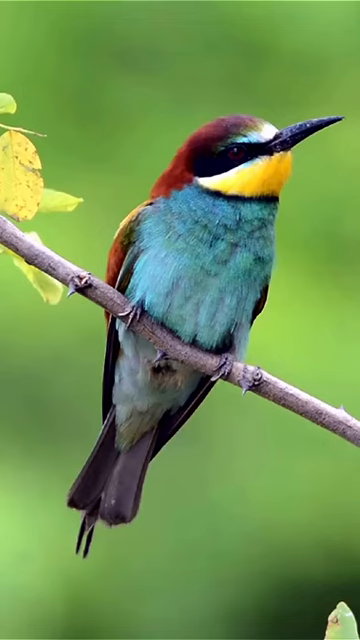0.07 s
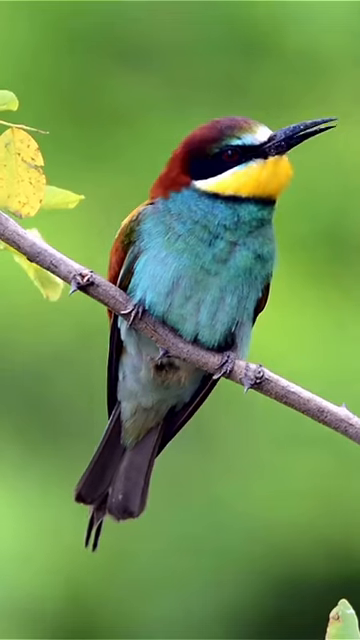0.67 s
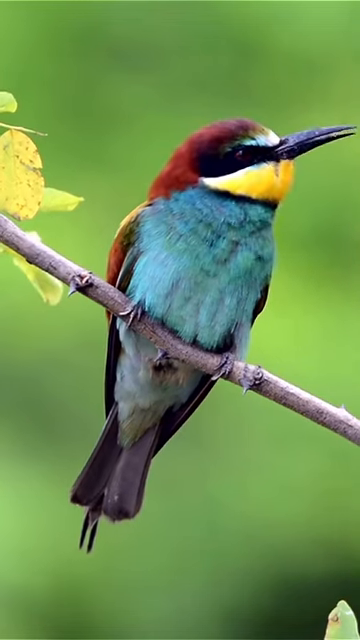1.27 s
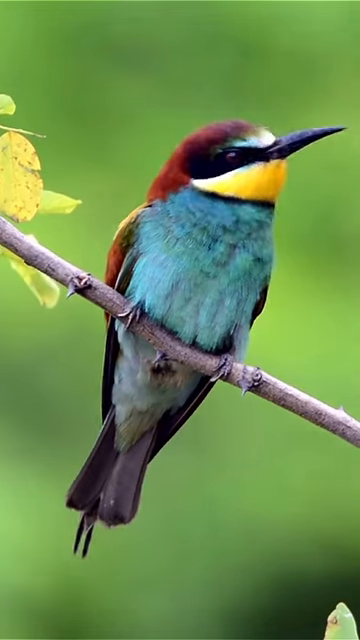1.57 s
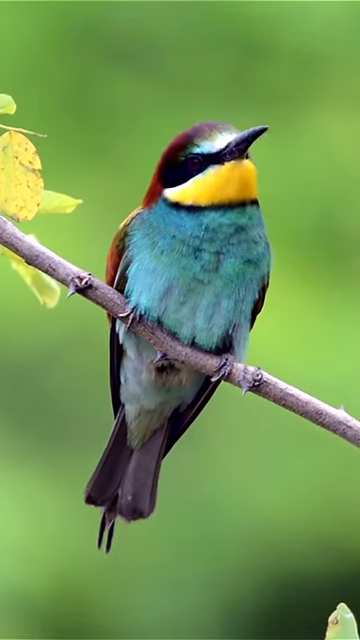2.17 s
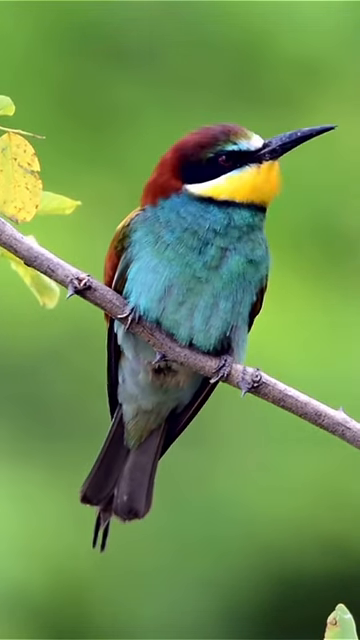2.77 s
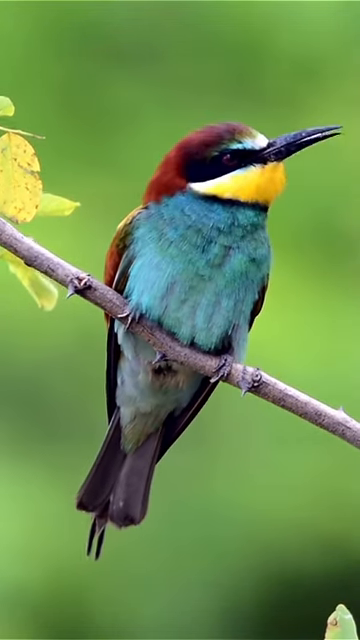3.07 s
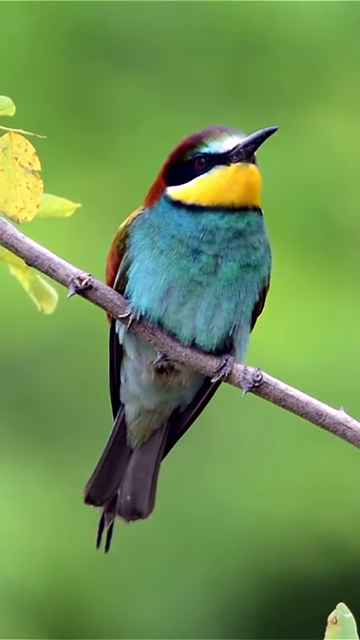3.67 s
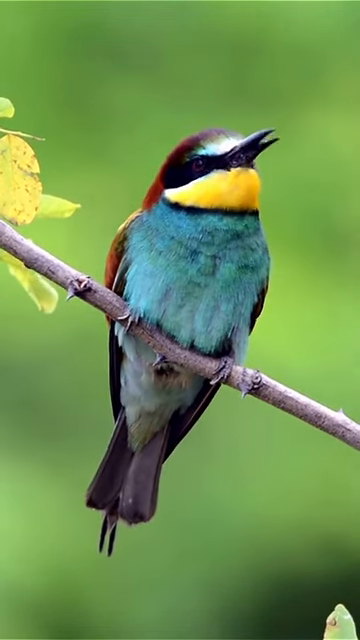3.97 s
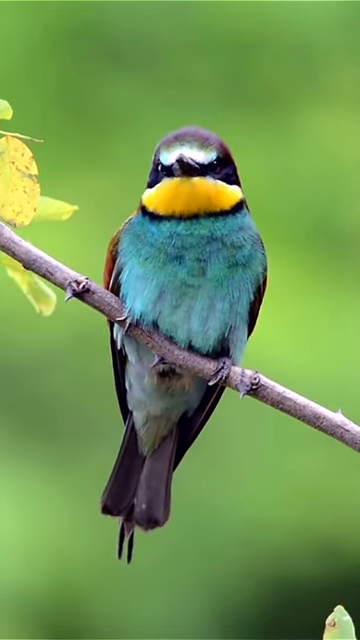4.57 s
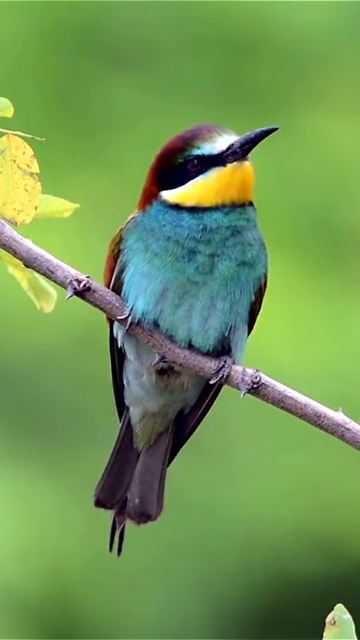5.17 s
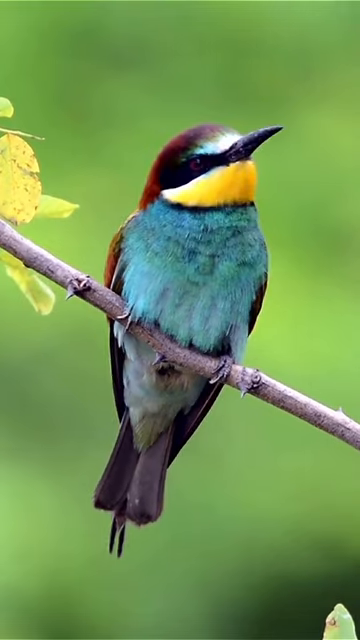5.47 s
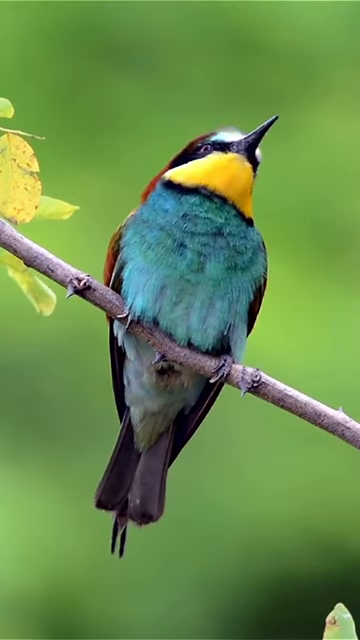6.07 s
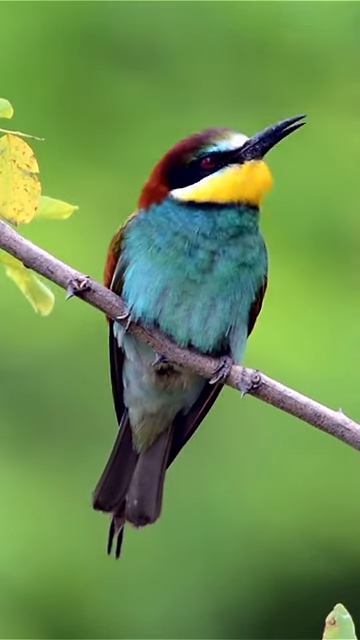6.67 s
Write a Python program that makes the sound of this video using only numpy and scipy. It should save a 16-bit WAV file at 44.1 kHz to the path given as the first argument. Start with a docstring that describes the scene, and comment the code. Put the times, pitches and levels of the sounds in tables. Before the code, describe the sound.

Small birds call in leafy woodland over a steady hiss of open air. Scattered twitters, sharp chips and a raspy warble come first, then a close bird pipes short, clear high notes through the middle. A small twig snaps, and pure rising whistles stand out towards the end. Thin chirps and a faint chorus lie far behind. Each note has a short echo, and everything sits near the centre of the microphone's image.

```python
"""A close bird pipes clear notes in leafy woodland, answered by a blurred warble further off, a lower
twitter, rising whistles and thin far chirps. Each voice is a gliding, trembling tone from the syrinx,
and trunks and leaves scatter every note into a short tail. Behind them lie far drawn-out cries,
a distant chorus, one twig snap that rings the wood, and the steady hiss of the open air."""
import sys
import numpy as np
from scipy import signal
from scipy.io import wavfile
from scipy.ndimage import uniform_filter1d

SR = 44100
rng = np.random.default_rng(int(sys.argv[2]) if len(sys.argv) > 2 else 0)


def put_to_file(sound):
    """Save the sound as 16-bit audio at rate SR, in the file named by the first command-line argument."""
    columns = np.atleast_2d(sound).T  # one column per channel
    safe = np.clip(columns, -1, 1)
    whole_steps = np.round(safe * 32767)
    wavfile.write(sys.argv[1], SR, whole_steps.astype(np.int16))


N = 300321
TIME = np.arange(N) / SR
ALONG = np.linspace(0, 1, 41)   # share of a note gone by


def piper():
    """The close bird's piping and a quick run of pips; a nearby trunk throws them back, so they beat."""
    # Each row: start in seconds, length in seconds, held pitch in Hz, drop onto it in Hz, glide in Hz,
    # loudest point as a share of the length, level in dB.
    piping = [ (1.825, 0.0374, 2682, 4, -330, .65, -41.5), (2.927, 0.026, 3080, 1, 803, 0.35, -39),
              (3.312, 0.019, 2907, 549, -150, 0.39, -35), (3.515, 0.025, 2970, 62, -62, .4, -51),
              (3.532, 0.066, 2907, -3, 22, 0.88, -40.5), (3.604, 0.043, 3407, 358, 9, 0.51, -44),
              (3.72, 0.036, 3238, 104, 27, 0.75, -41.5), (3.752, 0.027, 3350, -5, 124, 0.64, -41),
              (4.205, 0.056, 3260, 137, -77, 0.62, -37.5), (4.339, 0.049, 3260, 349, 4, 0.75, -38),
              (4.39, 0.017, 3270, -2, -54, 0.7, -39.5), (4.408, 0.037, 3090, 5, 78, 0.88, -43.5),
              (4.431, 0.033, 3430, -200, 0.5, 0.67, -40), (4.606, 0.054, 3467, -140, 30, 0.79, -36.5),
              (4.762, 0.06, 3530, 480, -300, .9, -38.5), ]
    # Each row: start of a pip in seconds, level in dB.
    pips = [(3.043, -51), (3.058, -55), (3.075, -53), (3.093, -51), (3.109, -51)]
    notes = [pipe(*row) for row in piping]
    notes += [sweep(s, length=.0075, hz=3150, glide_hz=0, level_db=db, ends_db=-1) for s, db in pips]
    voice = syrinx(notes, waver=.008, flutter_db=2.2, edge_s=.0025, rasp=.1)
    trunk_echo = from_db(-12) * np.roll(voice, int(.011 * SR))
    return woodland(voice + trunk_echo, direct_db=-1.3, scatter_db=-11.5, t60=.41, build_s=.004, width=.18)


def pipe(s, length, held_hz, drop_hz, glide_hz, crest, level_db):
    """A note that drops onto a held pitch, swells to its crest and fades."""
    settle_s, swell_db, fade_db = .00612, 11.5, 8.5
    t, crest = length * ALONG, np.clip(crest, .1, .9)
    hz = held_hz + drop_hz * np.exp(-t / settle_s) + glide_hz * (ALONG - .5)
    swelling = swell_db * (1 - ALONG / crest) ** 2
    fading = fade_db * ((ALONG - crest) / (1 - crest)) ** 2
    return np.column_stack([s + t, hz, level_db - np.where(ALONG < crest, swelling, fading)])


def arch(s, length, first_hz, middle_hz, last_hz, level_db, ends_db):
    """A note that bends through three pitches; ends_db sets its ends against its middle."""
    bow = 4 * ALONG * (1 - ALONG)
    hz = first_hz + (last_hz - first_hz) * ALONG + (middle_hz - (first_hz + last_hz) / 2) * bow
    return np.column_stack([s + length * ALONG, hz, level_db + ends_db * (1 - bow)])


def sweep(s, length, hz, glide_hz, level_db, ends_db):
    """A note that glides straight through its pitch."""
    return arch(s, length, hz - glide_hz / 2, hz, hz + glide_hz / 2, level_db, ends_db)


def slur(s, length, first_hz, last_hz, settle_s, level_db):
    """A note that speaks quickly, falls in pitch, then levels out and fades."""
    attack_s, rise_db, fade_db_per_s = .008, 6, 120
    t = length * ALONG
    fallen = 1 - np.exp(-t / settle_s)
    hz = first_hz + (last_hz - first_hz) * fallen / fallen[-1]
    below_db = rise_db * np.maximum(1 - t / attack_s, 0) + fade_db_per_s * t
    return np.column_stack([s + t, hz, level_db - below_db])


def syrinx(notes, waver, flutter_db, edge_s, trill_db=0, rasp=0):
    """A trembling tone follows each note's rows of seconds, Hz and dB; rasp jitters it, in radians."""
    trill_hz, sheen_above_hz = 167.3, 5512
    tremble = 1 + waver * drift(120)
    strength_db = flutter_db * drift(60)
    jitter = rasp * drift(450)
    out = np.zeros(N)
    for note in notes:
        start, end = note[0][0], note[-1][0]
        span = slice(max(int((start - edge_s) * SR), 0), int((end + edge_s) * SR))
        t = TIME[span]
        hz, level_db = in_time(note, t)
        hz = uniform_filter1d(hz, size=160) * tremble[span]   # the muscles round off each turn
        phase = 2 * np.pi * np.cumsum(hz) / SR + jitter[span]
        opening = np.clip(np.minimum(t - start, end - t) / (2 * edge_s) + .5, 0, 1)
        throb_db = trill_db * np.cos(2 * np.pi * trill_hz * (t - start))
        envelope = np.sin(np.pi / 2 * opening) ** 2 * from_db(level_db + strength_db[span] + throb_db)
        sheen_db = -21 - .0075 * np.maximum(hz - 2200, 0)   # a thin sheen, fainter over high notes
        sheen = from_db(sheen_db) * np.sin(phase + 2 * np.pi * sheen_above_hz * t)
        out[span] += np.sqrt(2) * envelope * (np.sin(phase) + sheen)
    return out


def warbler():
    """A trilled, raspy voice behind foliage; its slurs and upward flick are cleaner and more direct."""
    # Each row: start and length in seconds, first, middle and last pitch in Hz, level in dB.
    warble = [ (0.191, 0.05, 3235, 3260, 2880, -48.5), (0.289, 0.0314, 2196, 2340, 2510, -47),
              (0.378, 0.088, 3490, 3600, 3600, -53), (1.342, 0.044, 3400, 3980, 4260, -48),
              (1.58, 0.038, 3595, 3830, 3815, -41), (1.624, 0.017, 3750, 3670, 3520, -37.5),
              (1.64, 0.015, 3420, 3260, 3020, -46.5), (1.664, 0.033, 2780, 2834, 3060, -50.5),
              (1.696, 0.04, 2980, 3206, 3200, -45.5), (3.096, 0.036, 4050, 3990, 3880, -48.5),
              (3.142, 0.014, 3810, 3550, 3200, -44), (3.168, 0.017, 3230, 3210, 3150, -44.5),
              (3.85, 0.048, 2440, 2500, 2620, -51), (4.328, 0.016, 3910, 3900, 3700, -52.5),
              (4.892, 0.072, 3514, 3890, 3370, -45), (4.982, 0.0664, 2610, 3070, 3180, -49.5),
              (6.114, 0.02, 3500, 3920, 3900, -49.5), ]
    # The contour of a hooked call. Each row: seconds into the call, pitch in Hz, relative level in dB.
    hook_shape = [(0, 3387, -4), (.012, 3600, 4), (.033, 4350, -13.5), (.052, 3490, -8)]
    # Each row: start of a hooked call in seconds, level in dB.
    hooks = [(2.259, -50.5), (3.199, -46.5), (3.878, -44.5)]
    # Each row: start and length in seconds, first and last pitch in Hz, settling in seconds, level in dB.
    slurs = [ (0.263, 0.03, 2420, 2027, 0.017, -45.5), (0.407, 0.026, 2930, 2407, 0.042, -43),
             (0.441, 0.031, 2864, 2393, 0.035, -48), (2.079, 0.14, 3200, 1798, 0.014, -45.5),
             (2.969, 0.06, 2550, 2040, .070, -56), (3.364, 0.032, 2704, 2243, 0.044, -42.5),
             (3.407, 0.039, 2310, 1970, 0.08, -56), (3.777, 0.065, 3100, 2450, 0.015, -44.5),
             (4.072, 0.03, 3860, 3300, 0.03, -40.5), (4.105, 0.034, 2903, 2700, 0.021, -42.5),
             (4.518, 0.039, 4110, 3350, 0.085, -45.5), (4.823, 0.08, 3300, 2747, 0.011, -44), ]
    # The contour of the flick. Each row: time in seconds, pitch in Hz, level in dB.
    flick = [(6.154, 3100, -57), (6.169, 3850, -46), (6.181, 4400, -45), (6.192, 4400, -41),
             (6.203, 4270, -46)]
    rough_notes = [arch(*row, ends_db=-1) for row in warble]
    rough_notes += [np.add(hook_shape, (s, 0, db)) for s, db in hooks]
    clean_notes = [slur(*row) for row in slurs] + [flick]
    rough = syrinx(rough_notes, waver=.018, flutter_db=2.3, edge_s=.003, trill_db=1.5, rasp=.36)
    clean = syrinx(clean_notes, waver=.014, flutter_db=2, edge_s=.003, trill_db=1.5, rasp=.3)
    return (woodland(rough, direct_db=-2.3, scatter_db=-6, t60=.3, build_s=.003, width=.34)
            + woodland(clean, direct_db=-1.8, scatter_db=-6.5, t60=.38, build_s=.004, width=.34))


def twitterer():
    """A lower voice in the nearest trees: quick sweeps, soft arched peeps and up-down chips."""
    # Each row: start and length in seconds, first, middle and last pitch in Hz, level in dB.
    sweeps = [ (0.311, 0.0092, 2210, 1870, 1560, -54.5), (0.572, 0.01, 2374, 2080, 1700, -55),
              (0.709, 0.0087, 2350, 1970, 1570, -54), (0.837, 0.01, 2160, 1760, 1430, -58),
              (0.957, 0.012, 2320, 1930, 1590, -57.5), (1.871, 0.043, 2082, 1873, 3380, -54),
              (4.754, 0.036, 2986, 2095, 1480, -61.5), (5.581, 0.054, 2116, 1934, 1654, -59.5),
              (5.779, 0.025, 1436, 1690, 2080, -57), ]
    # Each row: start and length in seconds, top pitch in Hz, level in dB.
    peeps = [(0.674, 0.019, 1763, -55.5), (0.789, 0.037, 1847, -56), (0.918, 0.026, 1770, -57),
             (1.175, 0.019, 1846, -59.5), (1.64, 0.017, 1813, -60), (1.826, 0.044, 1886, -56),
             (1.927, 0.032, 1810, -55), (3.551, 0.032, 1798, -53), (3.658, 0.036, 1698, -58),
             (5.972, 0.014, 1644, -56), (6.558, 0.04, 1875, -58.5)]
    # Each row: start of a chip's downstroke in seconds, level in dB.
    chips = [(0.622, -38.5), (2.335, -40.5), (2.514, -41), (2.701, -43)]
    # A chip's two strokes. Each row: offset and length in seconds, first and last pitch in Hz, trim in dB.
    strokes = [(-.026, 0.019, 1784, 2546, -14.5), (0, 0.0167, 3340, 2560, -7.5)]
    sag_hz = 199   # a peep starts and ends this far below its top
    notes = [arch(*row, ends_db=3.5) for row in sweeps]
    notes += [arch(s, length, hz - sag_hz, hz, hz - sag_hz, db, ends_db=-7) for s, length, hz, db in peeps]
    notes += [sweep(s + offset, length, (first + last) / 2, last - first, db + trim_db, ends_db=5.5)
              for s, db in chips for offset, length, first, last, trim_db in strokes]
    voice = syrinx(notes, waver=.029, flutter_db=2, edge_s=.002696, rasp=.25)
    return woodland(voice, direct_db=0, scatter_db=-3.5, t60=.29, build_s=.0028, width=.25)


def whistler():
    """Pure rising whistles from a near tree, mostly direct, with a faint long tail."""
    # Each row: start and length in seconds, centre pitch in Hz, rise in Hz, level in dB.
    whistles = [(5.033, 0.065, 1840, 130, -50), (5.096, 0.081, 2110, 320, -49.5),
                (5.185, 0.021, 2193, 4, -50.5), (6.117, 0.095, 2083, 220, -53.5),
                (6.413, 0.12, 2147, 236, -46.5), (6.711, 0.17, 2207, 330, -42)]
    notes = [sweep(*row, ends_db=-4.5) for row in whistles]
    voice = syrinx(notes, waver=.0027, flutter_db=2, edge_s=.0064)
    return woodland(voice, direct_db=-3.5, scatter_db=-15.5, t60=.87, build_s=.022, width=.3)


def far_birds():
    # Each row: start and length in seconds, centre pitch in Hz, glide in Hz, level in dB.
    far_chirps = [ (1.248, 0.055, 4260, 111, -49.5), (1.448, 0.025, 4880, -170, -53.5),
                  (1.557, 0.039, 5500, 50, -54.5), (1.995, 0.025, 4000, 304, -52.5),
                  (2.667, 0.018, 4960, -2, -51), (2.751, 0.016, 3010, -400, -47.5),
                  (2.886, 0.04, 3580, -150, -47.5), (3.833, 0.012, 4100, -400, -41.5),
                  (5.269, .035, 4020, 292, -57), (5.379, 0.052, 4960, 98, -58),
                  (5.746, 0.02, 3525, 98, -45.5), (6.083, 0.069, 5550, -47, -51.5),
                  (6.577, 0.017, 3590, 300.5, -47), ]
    # Each row: start and length in seconds, first, middle and last pitch in Hz, level in dB.
    far_rasps = [ (1.258, 0.046, 4300, 4900, 4070, -55.5), (1.559, 0.028, 3410, 3200, 3450, -48.5),
                 (2.146, 0.075, 3700, 5300, 3850, -52), (3.12, 0.07, 4930, 5000, 3850, -58),
                 (3.781, 0.06, 3900, 5320, 3930, -52.5), (4.57, 0.08, 5060, 5360, 4060, -53.5),
                 (4.9, 0.07, 3500, 3950, 3300, -49.5), (5.645, 0.06, 3900, 5330, 4090, -50),
                 (6.073, 0.041, 5600, 5500, 3780, -51), ]
    # Each row: start and length in seconds, centre pitch in Hz, glide in Hz, level in dB.
    far_cries = [(0.756, 0.79, 1337, 9, -69.5), (2.052, 0.36, 758, -39, -73), (2.415, 0.53, 1287, -20, -66)]
    chirps = syrinx([sweep(*row, ends_db=5) for row in far_chirps],
                    waver=.017, flutter_db=2.5, edge_s=.0029, rasp=.3)
    rasps = syrinx([arch(*row, ends_db=-1) for row in far_rasps],
                   waver=.035, flutter_db=2.5, edge_s=.005, rasp=.85)
    cries = syrinx([sweep(*row, ends_db=1.5) for row in far_cries], waver=.0447, flutter_db=4, edge_s=.037)
    return (woodland(chirps, direct_db=-9, scatter_db=-11.5, t60=.53, build_s=.0051, width=.35)
            + woodland(rasps, direct_db=-9, scatter_db=-10, t60=.24, build_s=.0044, width=.35)
            + woodland(cries, direct_db=-2.5, scatter_db=-4, t60=.56, build_s=.0071, width=.28))


def distant_chorus():
    """Birds too distant to tell apart, in four registers that swell and sink separately."""
    # Level rides for three of the registers. Each row: time in seconds, level in dB.
    mid_ride = [(.7, -60.5), (1.0, -68.5), (1.6, -68.5), (2.7, -64), (3.2, -66), (5.5, -79), (6.7, -63)]
    low_ride = [(.2, -59.5), (.9, -79), (1.2, -63), (1.6, -72.5), (3.9, -83)]
    thin_ride = [(.2, -64.5), (1.1, -70.5), (2.6, -69.5), (3.6, -63), (4.3, -70), (6.5, -65.5)]
    return (flock(flurry_ride(), centre_hz=4350, spread=.3, direct_db=-8, rasp=.85, count=480)
            + flock(mid_ride, centre_hz=2720, spread=.25, direct_db=-6.5, rasp=1.2, count=300)
            + flock(low_ride, centre_hz=1702, spread=.178, direct_db=10, rasp=.4, count=110)
            + flock(thin_ride, centre_hz=5150, spread=.17, direct_db=-6, rasp=.7, count=400))


def flurry_ride():
    """The high voices flare up from a quiet murmur; gives rows of seconds and dB."""
    # Each row: start and length of a flurry in seconds, level in dB.
    flurries = [(0.192, 0.037, -55), (1.28, 0.05, -62), (1.56, 0.019, -59), (2.186, 0.1, -54.5),
                (3.12, 0.26, -63), (3.78, 0.069, -56), (4.058, 0.18, -59), (4.9, 0.074, -60),
                (5.676, 0.1, -60), (6.083, 0.073, -60.5), (6.496, 0.22, -60.5)]
    rest_db, fade_db_per_s = -79, 203
    t = np.linspace(0, N / SR, 700)
    flares = [db - fade_db_per_s * np.maximum(np.abs(t - s - length / 2) - length / 2, 0)
              for s, length, db in flurries]
    return np.column_stack([t, np.maximum(np.max(flares, axis=0), rest_db)])


def flock(ride, centre_hz, spread, direct_db, rasp, count):
    """Many short random glides, blurred by the trees, following one level ride."""
    notes, note_s = [], .02234
    for k, (when, up, down, slope) in enumerate(rng.random((count, 4))):
        s = (k + when) / count * N / SR
        hz = centre_hz * np.exp(spread * (up - down))
        glide = np.exp(.1411 * (2 * slope - 1))
        notes.append([(s, hz / glide, 0), (s + note_s, hz * glide, 0)])
    voices = syrinx(notes, waver=.0269, flutter_db=3, edge_s=.004, rasp=rasp)
    blurred = woodland(voices, direct_db, scatter_db=0, t60=.25, build_s=.008, width=.45)
    return fader(ride) * rms_one(blurred)


def twig():
    """A twig snaps and knocks again, ringing the wood's short modes; so small a thing radiates no bass."""
    # Each row: time of a knock in seconds, level in dB.
    knocks = [(5.346, -43), (5.353, -49)]
    # Each row: frequency of a mode in Hz, level in dB, seconds to decay by 60 dB.
    modes = [(323, -10.5, 0.06), (720, 8, 0.0043), (1380, 1.5, 0.036), (2385, 1, 0.02), (2770, 0, 0.025)]
    clicks, wood = np.full(N, 1e-18), 0
    for s, level_db in knocks:
        clicks[round(s * SR)] = from_db(level_db)
    for hz, level_db, t60 in modes:
        radius, angle = from_db(-60 / (t60 * SR)), 2 * np.pi * hz / SR
        ring = signal.lfilter([.5, 0, -.5], [1, -2 * radius * np.cos(angle), radius * radius], clicks)
        wood = wood + from_db(level_db) * ring
    return woodland(wood, direct_db=-4, scatter_db=-6.5, t60=.56, build_s=.04, width=.3)


def woodland(x, direct_db, scatter_db, t60, build_s, width):
    """The direct sound, then a cloud of echoes from trunks and leaves that builds, dulls and dies."""
    leaf_cut_hz, leaf_loss_db_per_s = 3200, 70   # leaves soak up the treble faster
    t = TIME[:SR // 2]
    cloud = rng.standard_normal((2, len(t))) * (1 - np.exp(-t / build_s)) * from_db(-60 * t / t60)
    cloud = cloud / np.sqrt(np.sum(cloud ** 2, axis=1, keepdims=True))
    dull = signal.sosfiltfilt(signal.butter(4, leaf_cut_hz, fs=SR, output="sos"), cloud)
    mid, side = dull + (cloud - dull) * from_db(-leaf_loss_db_per_s * t)
    paths = (mid + width * side * np.array([[1], [-1]])).astype(np.float32)
    echoes = signal.fftconvolve(x[None].astype(np.float32), paths, axes=1)[:, :N]
    return from_db(direct_db) * x + from_db(scatter_db) * echoes


def open_air():
    """An even hiss, a low rush that swells towards the end, one soft whoosh and a faint top sizzle."""
    # Tone curves. Each row: frequency in Hz, relative spectral density in dB.
    hiss = [(22, -16), (36, -16.5), (55, -8.5), (110, -5.5), (200, -4.5), (500, 1.5), (750, 0.5), (1100, 0),
            (1700, 1.5), (2600, -1), (3800, 3.5), (5300, -5), (6200, -3), (6700, -7.5), (8800, -4),
            (10000, -16)]
    rush = [(100, -31.5), (200, -5.5), (300, -0.5), (450, -3.5), (800, -3)]
    whoosh = [(550, -6.5), (800, 1.5), (1200, -15.5), (1800, 9)]
    sizzle = [(7000, -3), (8300, -4.5), (10000, -3)]
    # Level rides. Each row: time in seconds, level in dB.
    rush_ride = [(.3, -77.5), (3.4, -84), (3.7, -69), (3.95, -71.5), (4.15, -87.5), (5.6, -72.5),
                 (6.3, -70), (6.5, -63), (6.8, -62.5)]
    whoosh_ride = [(3.9, -79), (4.1, -59.5), (4.25, -63), (4.5, -83)]
    sizzle_ride = [(.25, -83), (.35, -61.5), (.5, -65.5), (1.0, -86.5), (3.5, -79), (3.85, -70),
                   (4.0, -87.5), (5.9, -75), (6.6, -60.5), (6.8, -79)]
    return (from_db(-58.5) * air_noise(hiss, patchy_db=1.5)
            + fader(rush_ride) * air_noise(rush, patchy_db=1.5)
            + fader(whoosh_ride) * air_noise(whoosh, patchy_db=2)
            + fader(sizzle_ride) * air_noise(sizzle, patchy_db=6))


def air_noise(spectrum, patchy_db):
    """Unit-power stereo noise in half-octave bands, each with its own level, flutter and width."""
    # Each row: frequency in Hz, left-right likeness from 0 (wide) to 1 (mono).
    likeness = [(60, 0.85), (700, 0.6), (3000, 0.54), (5000, 0.79), (7000, 1)]
    edges_hz = 21 * 2 ** np.arange(0, 9.6, .5)
    mid, side, white = 0, 0, rng.standard_normal((2, 2, N))
    for k, (low, high) in enumerate(zip(edges_hz, edges_hz[1:])):
        hz = np.sqrt(low * high)
        if spectrum[0][0] < high and low < spectrum[-1][0]:
            band = signal.butter(2, [low, high], "band", fs=SR, output="sos")
            shared, apart = signal.sosfilt(band, white[k % 2])
            alike = np.clip(at_hz(likeness, hz), 0, 1)
            gain = from_db(at_hz(spectrum, hz) + patchy_db * drift(9.5))
            mid = mid + np.sqrt(1 + alike) * gain * shared
            side = side + np.sqrt(1 - alike) * gain * apart
    return rms_one(np.array([mid + side, mid - side]))


def drift(rate_hz):
    """A smooth random wobble of unit spread, rolling off above rate_hz."""
    step, run_in = 20, 2000
    pole = np.exp(-2 * np.pi * step * rate_hz / SR)
    white = rng.standard_normal(N // step + run_in + 2)
    slow = signal.lfilter([1], [1, -2 * pole, pole * pole], white)[run_in:]
    return np.interp(np.arange(N) / step, np.arange(len(slow)), rms_one(slow))


def from_db(db):
    """Decibels to gain."""
    return np.exp(np.log(10) / 20 * np.asarray(db))


def rms_one(x):
    """Scale to unit power."""
    return x / np.sqrt(np.mean(x ** 2) + 1e-20)


def in_time(rows, t=TIME):
    """Each column of a curve, joined by straight lines; the first column is time."""
    s, *columns = np.transpose(rows)
    return [np.interp(t, s, c) for c in columns]


def fader(ride):
    """Gain over time from rows of seconds and dB."""
    return from_db(in_time(ride)[0])


def at_hz(points, hz):
    """Read a spectrum on a log-frequency axis."""
    f, value = np.transpose(points)
    return np.interp(np.log(hz), np.log(f), value)


def scene():
    """Everything sits almost in the centre, a shade to the right."""
    birds = piper() + twitterer() + whistler() + warbler() + far_birds() + distant_chorus()
    return (birds + twig() + open_air()) * from_db([[-.25], [.25]])


def record(dry):
    """The sound switches on abruptly; the top is cut steeply."""
    start_s, cutoff_hz = .197, 9948
    low_pass = signal.ellip(12, .2, 70, cutoff_hz, fs=SR, output="sos")
    return signal.sosfilt(low_pass, dry * (TIME >= start_s))


dry = scene()
out = record(dry)
put_to_file(out)
```